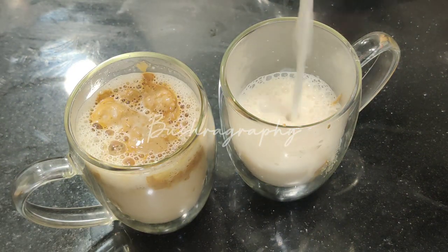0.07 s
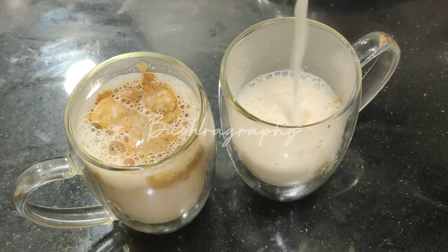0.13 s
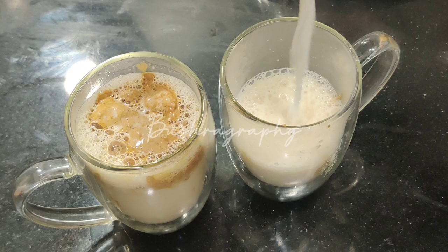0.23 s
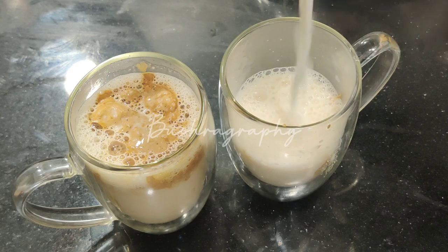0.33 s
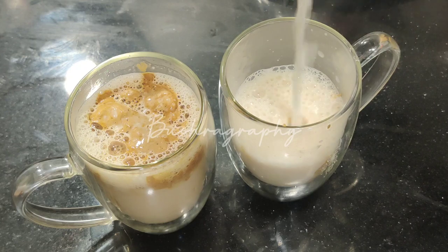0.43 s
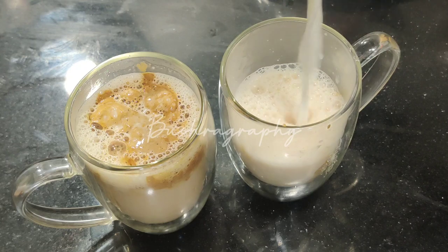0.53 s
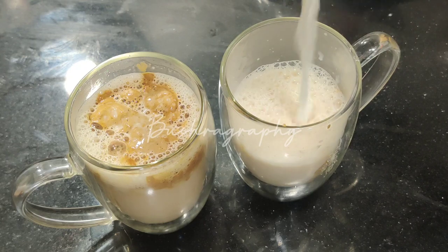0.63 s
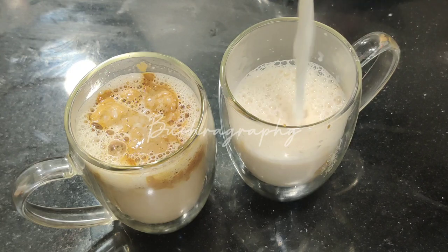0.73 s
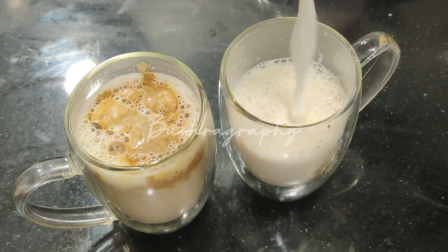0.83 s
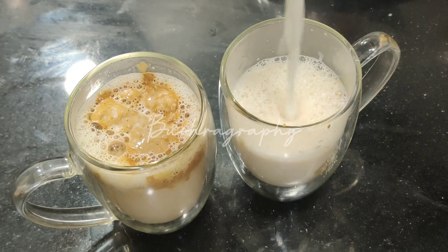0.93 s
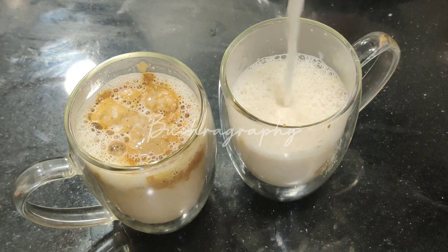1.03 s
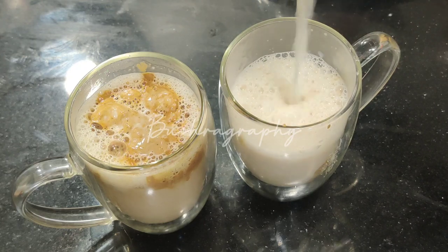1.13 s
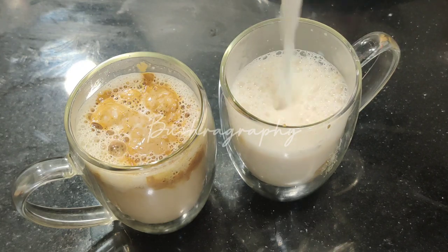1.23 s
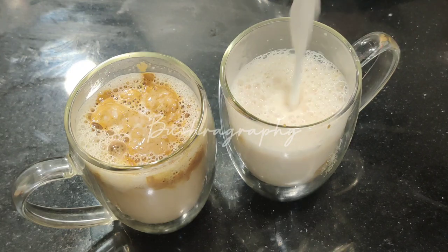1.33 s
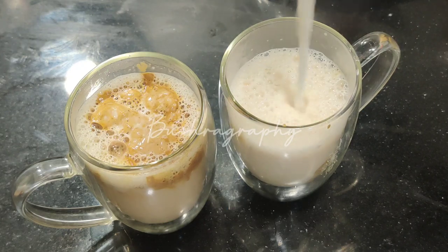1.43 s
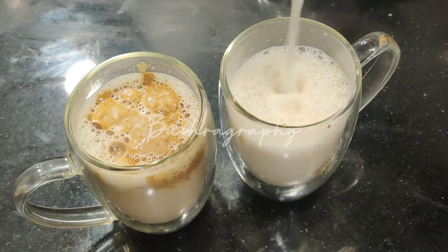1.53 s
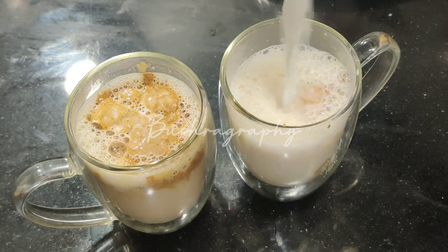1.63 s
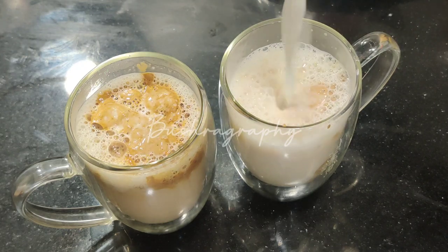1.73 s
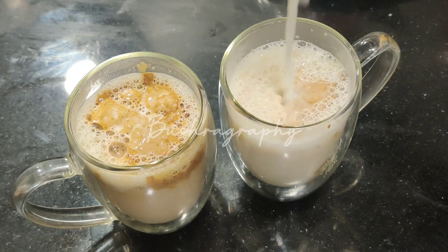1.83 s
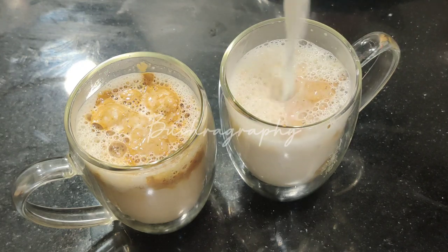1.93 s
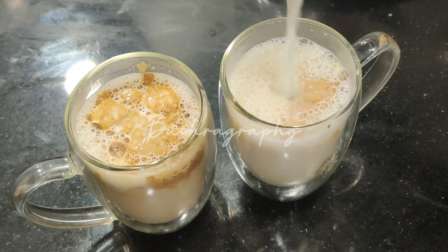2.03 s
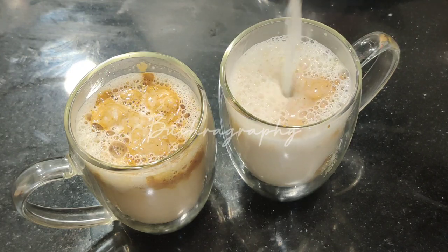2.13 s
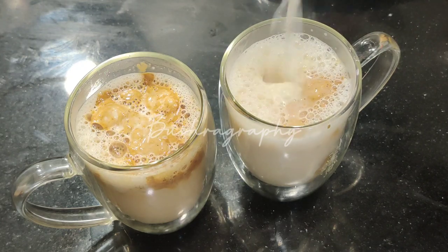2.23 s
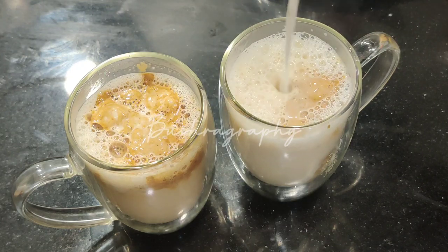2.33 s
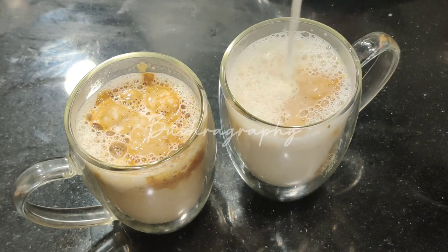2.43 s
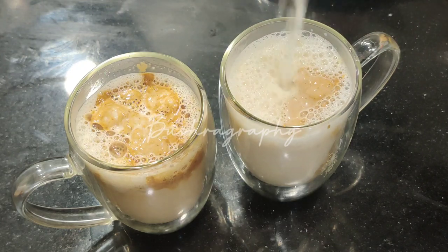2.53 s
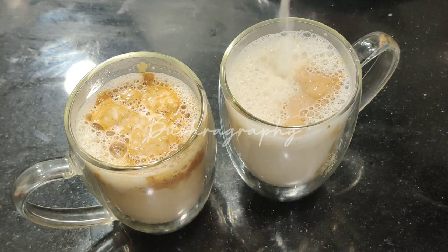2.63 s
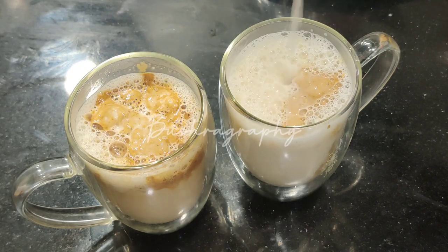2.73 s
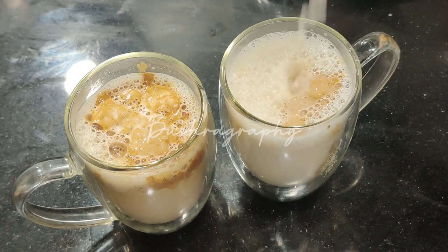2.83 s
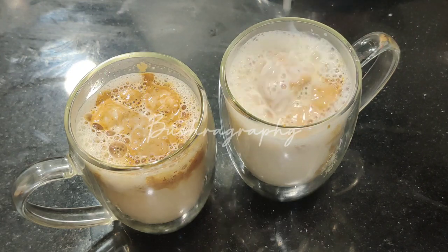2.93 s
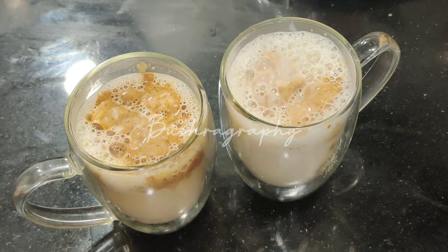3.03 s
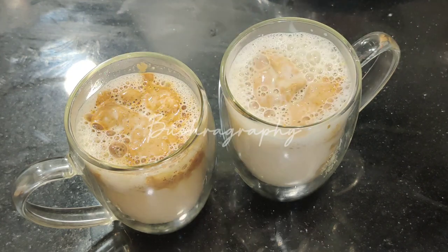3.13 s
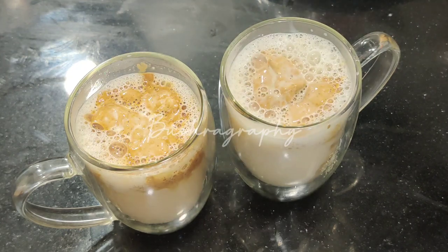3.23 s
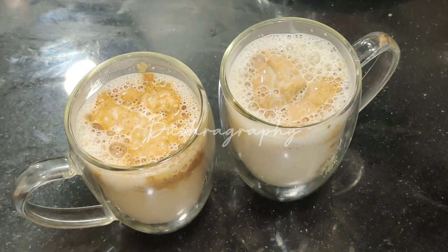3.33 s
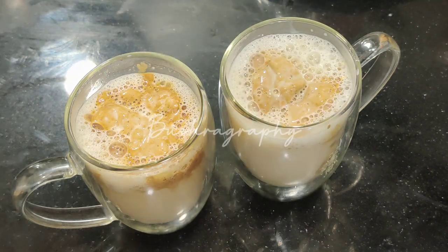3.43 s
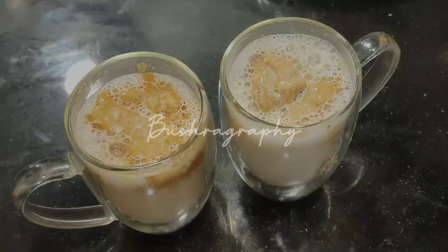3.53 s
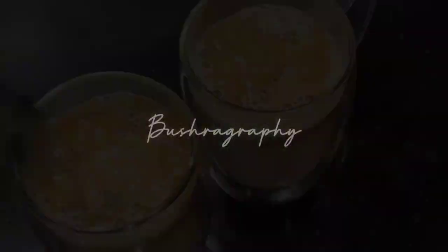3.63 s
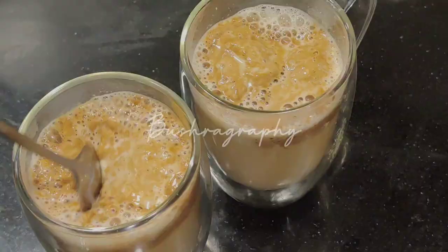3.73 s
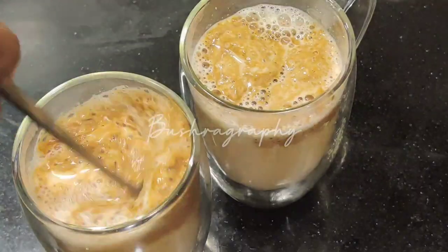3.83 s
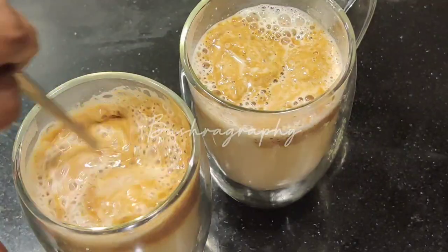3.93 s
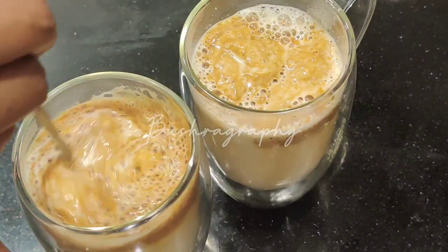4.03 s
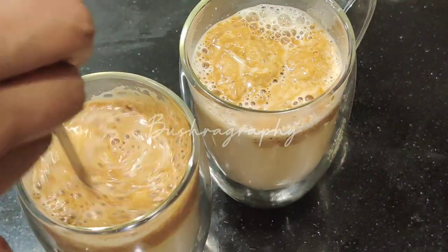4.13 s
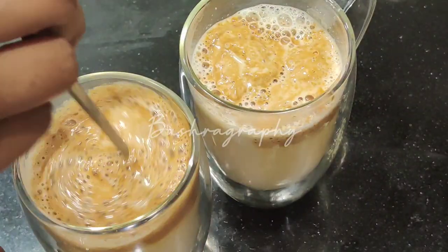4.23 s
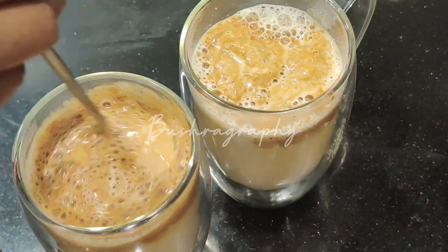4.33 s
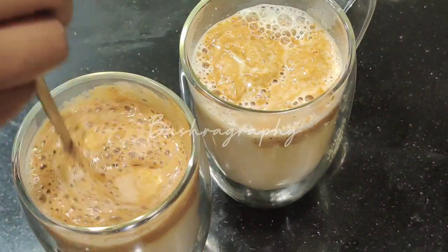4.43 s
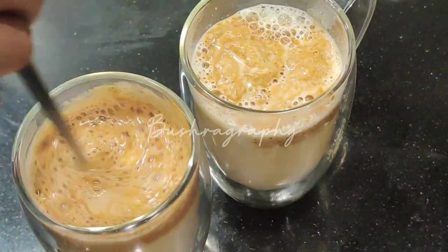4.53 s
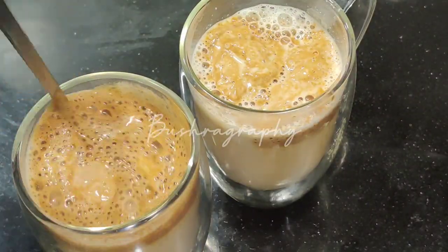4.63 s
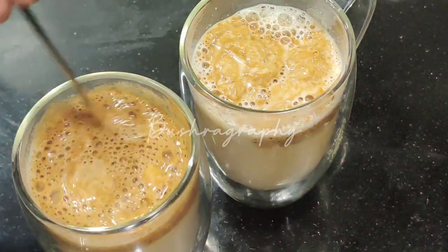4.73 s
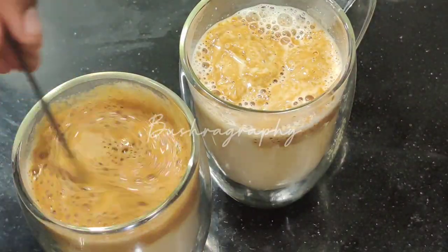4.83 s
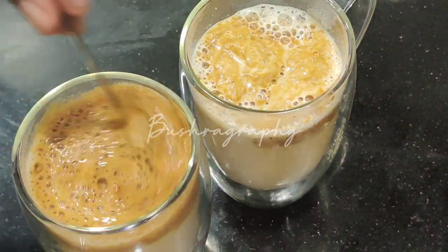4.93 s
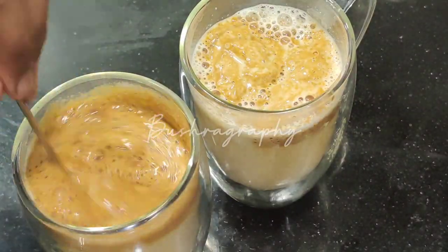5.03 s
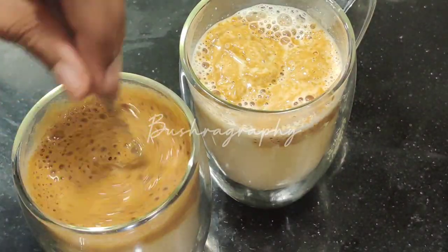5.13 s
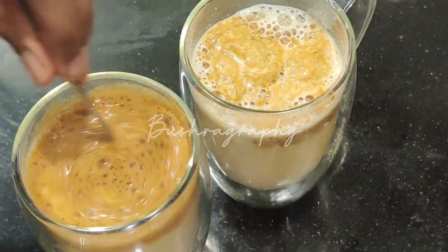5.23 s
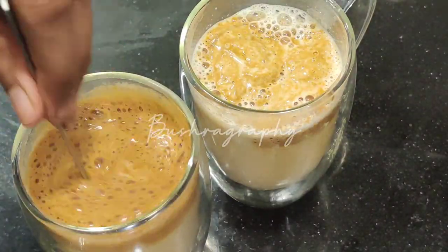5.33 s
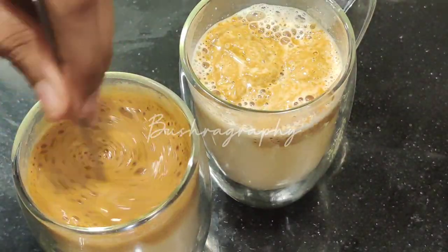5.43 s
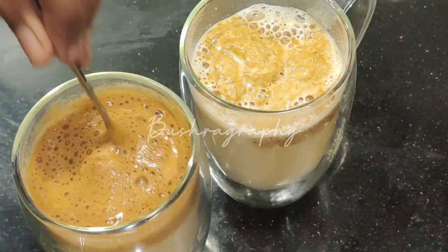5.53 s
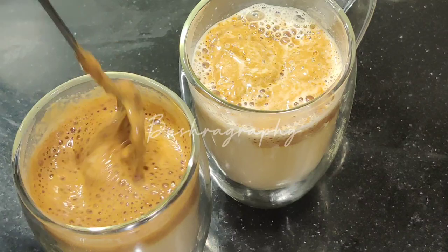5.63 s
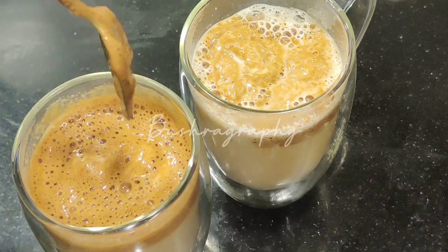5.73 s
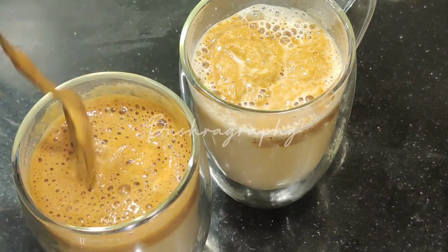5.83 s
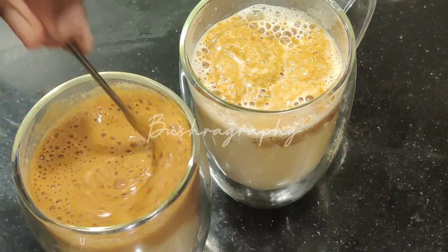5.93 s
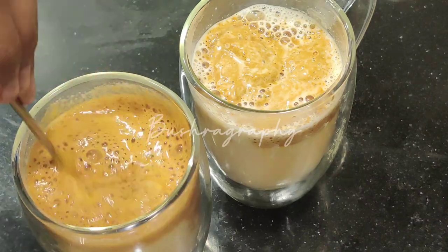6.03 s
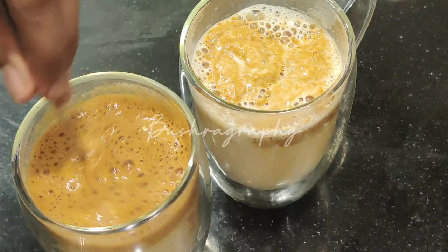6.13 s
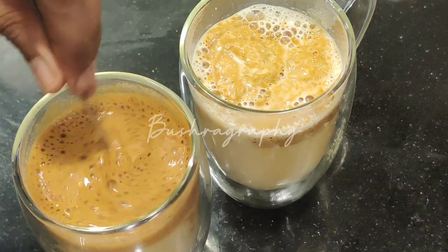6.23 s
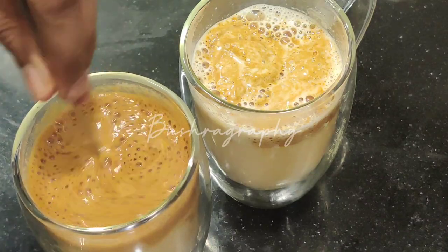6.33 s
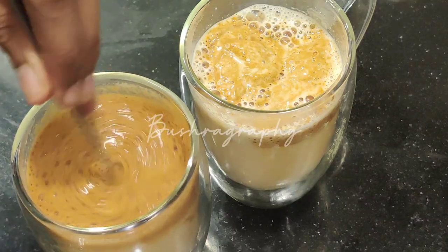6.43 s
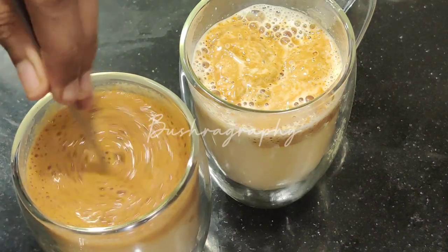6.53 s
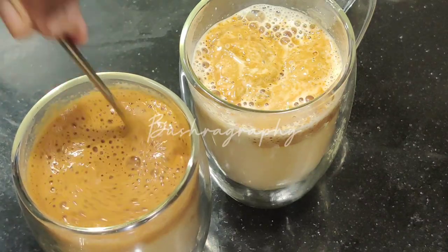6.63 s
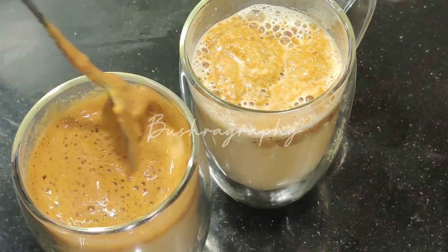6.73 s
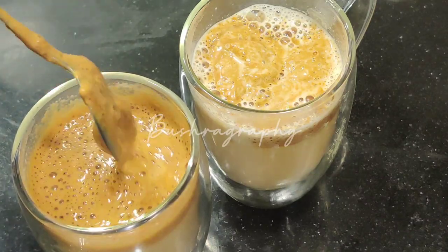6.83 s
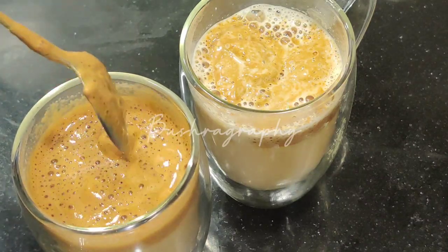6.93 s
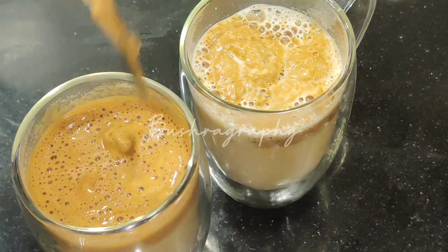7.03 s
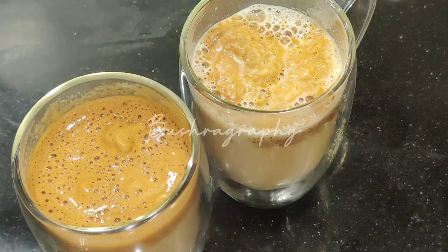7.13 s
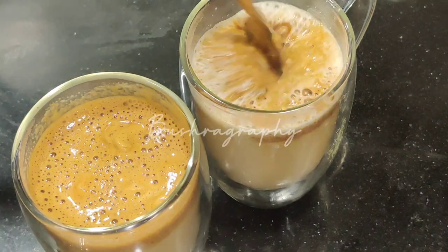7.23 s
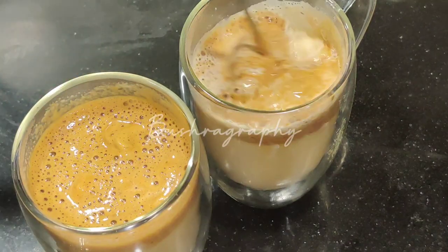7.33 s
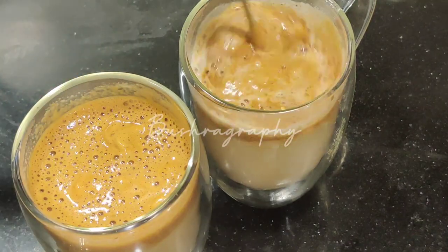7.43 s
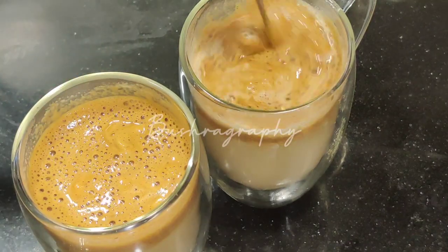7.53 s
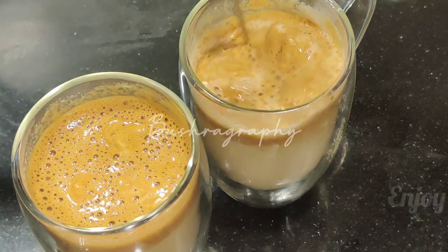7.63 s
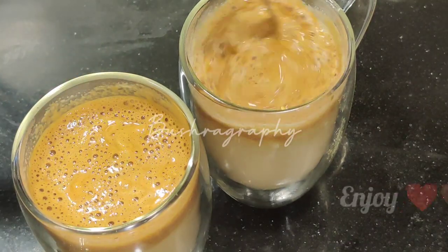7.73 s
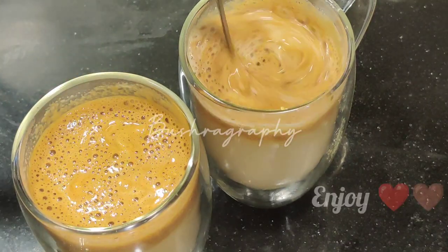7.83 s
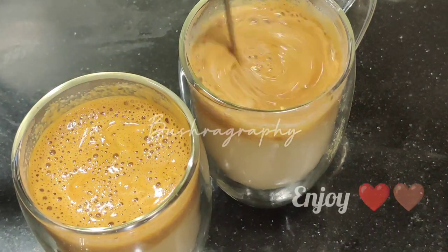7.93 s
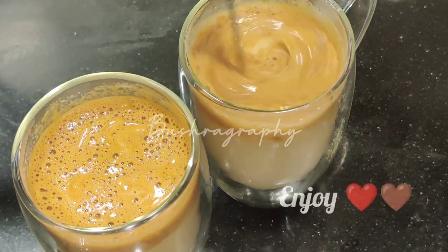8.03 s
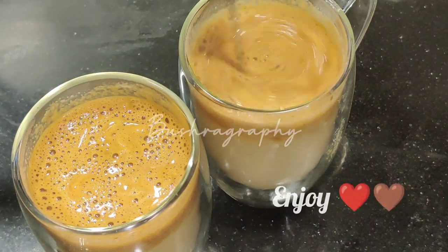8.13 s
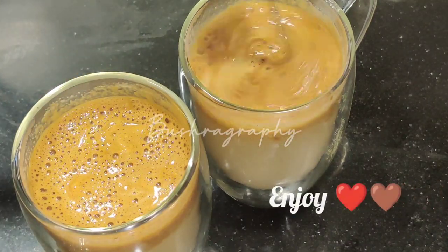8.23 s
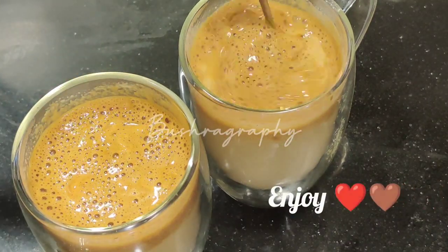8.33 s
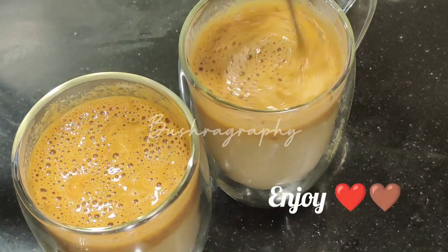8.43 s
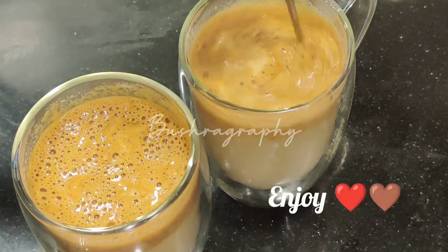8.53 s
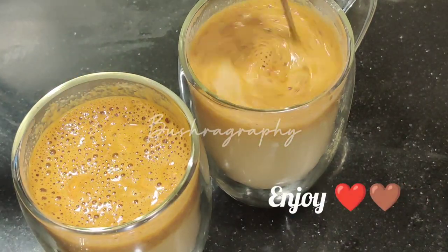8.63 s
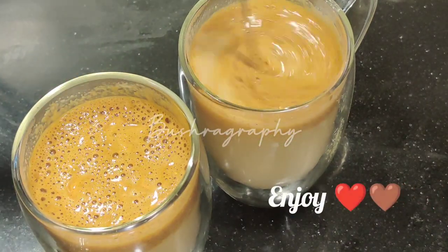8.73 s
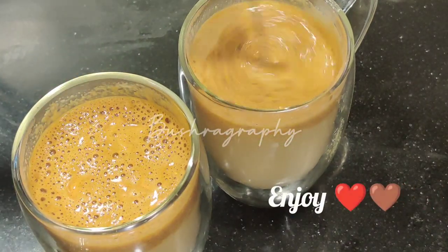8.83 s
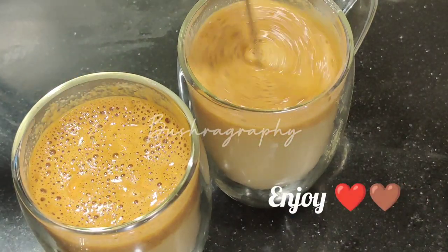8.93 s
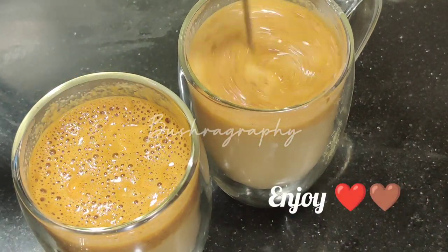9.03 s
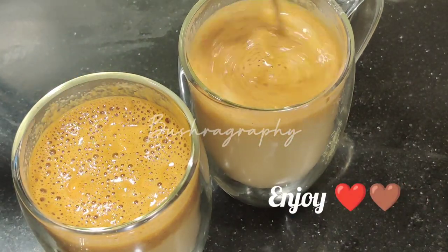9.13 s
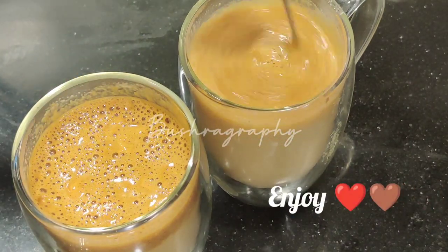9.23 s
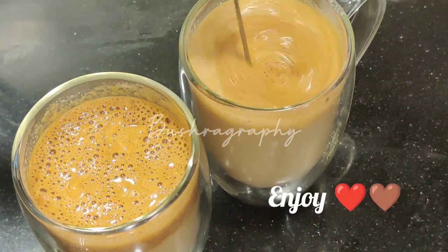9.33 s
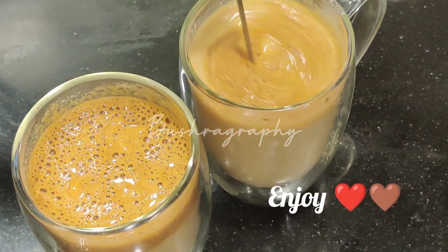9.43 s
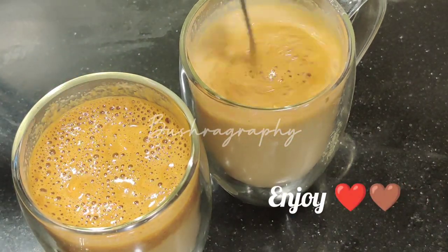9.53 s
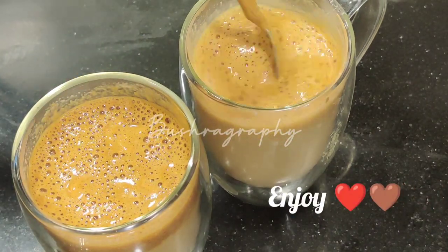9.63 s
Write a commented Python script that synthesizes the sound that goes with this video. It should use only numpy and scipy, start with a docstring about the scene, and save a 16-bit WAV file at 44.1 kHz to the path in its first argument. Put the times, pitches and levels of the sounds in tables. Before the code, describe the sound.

In a small kitchen, close up, milk streams into a glass mug for about three seconds with quick plops, wet slaps, gurgling and crackling froth. It thins out and the sound fades nearly to silence. Then a steel spoon stirs one full mug with dull thuds and soft scrapes, then another with brighter, busier knocks, over low hum and faint hiss.

```python
"""Hot milk poured, then stirred

Milk runs into a glass mug: swarms of gliding sines plop near the air column's pitch, short noise pops crackle as froth.
The sound dips almost to silence; then a steel spoon scrapes and knocks on one full mug and the next, as noisy
contact forces exciting damped glass modes. A wavering hum, low rumble, soft bumps, hiss and faint whines lie
beneath, and a short diffuse kitchen tail follows milk and spoon."""
import sys
import numpy as np
from scipy import signal
from scipy.fft import rfft, irfft, next_fast_len
from scipy.io import wavfile
from scipy.ndimage import uniform_filter1d, map_coordinates

SR = 44100
rng = np.random.default_rng(int(sys.argv[2]) if len(sys.argv) > 2 else 0)


def wrap_up_sound(samples):
    """Save the sound to the file named by the first command line argument, as 16-bit audio."""
    columns = np.atleast_2d(samples).T
    # keep every value between -1 and 1, then stretch to whole-number steps
    tamed = np.clip(columns, -1, 1)
    steps = np.round(tamed * 32767).astype(np.int16)
    wavfile.write(sys.argv[1], SR, steps)


N = 426447  # length [samples]


def amp(db):
    """Decibels to gain."""
    return 10 ** (np.asarray(db) / 20)


def unit(x):
    """Scale to rms 1."""
    return x / np.sqrt(np.mean(x ** 2) + 1e-20)


def along(points, hz):
    """Read (frequency, value) points on a logarithmic frequency axis."""
    f, value = np.transpose(points)
    return np.interp(np.log(hz + 1), np.log(f + 1), value)


def curves(rows):
    """Read each column after the time as a curve with one value per sample."""
    times, *columns = np.transpose(rows)
    t = np.arange(N) / SR
    return [np.interp(t, times, column) for column in columns]


def wobble(rate):
    """A smooth random curve with `rate` knots a second."""
    knots = rng.standard_normal(int(N * rate / SR) + 4)
    return map_coordinates(knots, [np.arange(N) * rate / SR])


def filtered(x, response):
    """Multiply the spectrum of x by a response given as a function of frequency."""
    n = x.shape[-1]
    padded = next_fast_len(n + 4096)
    spectrum = rfft(x, padded) * response(np.fft.rfftfreq(padded, 1 / SR))
    return irfft(spectrum, padded)[..., :n]


def colour(x, spectrum):
    """Shape x with a (frequency, level) spectrum."""
    return filtered(x, lambda hz: amp(along(spectrum, hz)))


def stereo(pair, side):
    """Use two unrelated signals as middle and side."""
    middle, difference = pair[0], side * pair[1]
    return np.array([middle + difference, middle - difference])


def add(track, s, sound):
    """Mix a sound into the track at s seconds."""
    start = max(round(s * SR), 0)
    part = track[:, start:start + sound.shape[-1]]
    part += sound[:, :part.shape[-1]]


def overlay(s, sounds):
    """Sum one channel of short sounds, one row per event, at their times s."""
    index = (s * SR).astype(int)[:, None] + np.arange(sounds.shape[1])
    return np.bincount(index.ravel(), sounds.ravel(), N)[:N]


def grains(s, hz, cycles, gain, rise):
    """Damped sines, one per event, gliding up by `rise` and given a random phase gap between the ears."""
    t = np.arange(SR // 50) / SR
    age = t * (hz / cycles)[:, None]
    phase = 2 * np.pi * hz[:, None] * t * (1 + rise * np.minimum(age, 2) / 2)
    decay = np.exp(-2 * age)
    onset = 1 - np.exp(-8 * age)
    life = gain[:, None] * decay * onset
    lag = 0.29 * rng.standard_normal((len(s), 1))
    return np.array([overlay(s, life * np.sin(phase + ear * lag)) for ear in (1, -1)])


def bursts(s, gain, t60):
    """Tiny pops: decaying puffs of noise, each with a sharper first edge."""
    t = np.arange(SR // 100) / SR
    noise = stereo(rng.standard_normal((2, len(s), len(t))), side=0.75)
    edge = 1 + 1.5 * np.exp(-t / 0.00027)
    puffs = noise * amp(-60 * t / t60) * edge
    return np.array([overlay(s, gain[:, None] * ear) for ear in puffs])


def surges(rows, rise_s, fall_s):
    """An envelope that swells up to each (time, level) event and dies away after it."""
    t = np.arange(N) / SR
    envelope = 0
    for s, db in rows:
        slope = np.minimum((t - s) / rise_s, (s - t) / fall_s)
        envelope = envelope + amp(db) * np.exp(np.maximum(slope, -20))
    return envelope


def steady(x):
    """Even out loudness to about rms 1, following power over roughly an eighth of a second."""
    power = uniform_filter1d(np.mean(x ** 2, 0), SR // 8)
    power = np.abs(uniform_filter1d(power, SR // 20))
    return x / np.sqrt(power + 1e-3 * power.max())


# spectrum of the room hiss: (frequency [Hz], relative level [dB])
HISS_SPECTRUM = [(76, -36), (130, -1.5), (300, -5), (430, -7.5), (680, -7), (1300, -15), (1900, -16),
                 (4400, -22), (7500, -27), (11300, -28), (15000, -21.5), (15800, -36)]
# likeness of the hiss in the two ears: (frequency [Hz], left-right correlation [-1 to 1])
HISS_LIKENESS = [(60, .99), (180, 0.97), (550, 0.5), (1650, -0.25), (15000, -0.13)]


def room_hiss():
    """Coloured noise whose middle and side balance sets how alike the ears are at each frequency."""
    def middle_and_side(hz):
        angle = np.arccos(np.clip(along(HISS_LIKENESS, hz), -1, 1)) / 2
        return amp(along(HISS_SPECTRUM, hz)) * [np.cos(angle), np.sin(angle)]
    pair = filtered(rng.standard_normal((2, N)), middle_and_side)
    return amp(-52.0 + 0.12 * wobble(2.1)) * unit(stereo(pair, side=1))


# mean level of the hum: (time [s], level [dB])
HUM_LEVEL = [(2.7, -44.5), (3.1, -48.5), (7.2, -49), (7.8, -46.5)]


def appliance_hum():
    """A low sine wandering in phase and level."""
    t = np.arange(N) / SR
    level_db, = curves(HUM_LEVEL)
    tone = np.sin(2 * np.pi * 89.5 * t + 0.9 * wobble(20))
    return amp(level_db + 1.3 * wobble(21)) * unit(tone)


# spectrum of the rumble: (frequency [Hz], relative level [dB])
RUMBLE_SPECTRUM = [(15, -21), (28, -1.5), (43, -8), (56, -2), (75, -4), (120, -5), (170, -15.5),
                   (300, -45.5)]
# strength of the milk stream, also driving pour(); it falters once and thins out: (time [s], relative level [dB])
STREAM_FLOW = [(0, 1.5), (.15, 0), (.22, -7), (.32, 2.5), (.6, 0), (2.7, -1), (2.84, -10), (3.1, -28)]
RUMBLE_DB, POUR_RUMBLE_DB = -52, -47  # constant part; part following the stream, at 0 dB flow


def rumble():
    """Low noise, nearly the same in both ears, stronger while the stream runs."""
    flow_db, = curves(STREAM_FLOW)
    gain = np.hypot(amp(RUMBLE_DB), amp(POUR_RUMBLE_DB + flow_db))
    noise = colour(rng.standard_normal((2, N)), RUMBLE_SPECTRUM)
    return gain * unit(stereo(noise, side=.12))


# soft low bumps of handling: (time [s], level [dB])
HANDLING_BUMPS = [(.77, -47), (3.72, -46), (3.84, -46.5), (3.96, -47)]
BUMP_RISE_S, BUMP_FALL_S = 0.065, 0.14


def handling_bumps():
    """Low noise that swells and dies away at each bump."""
    thud = colour(rng.standard_normal(N), [(20, -8), (38, -8), (70, -17), (400, -54.5)])
    return surges(HANDLING_BUMPS, BUMP_RISE_S, BUMP_FALL_S) * unit(thud)


# faint whines: (frequency [Hz], level [dB])
FAINT_WHINES = [(1830, -73), (1990, -78), (2821, -80), (3289, -80), (4441, -80), (5529, -80), (11989, -83),
                (13814, -76)]


def whines():
    """Thin sines, their phase wavering separately in each ear."""
    t = np.arange(N) / SR
    total = 0
    for hz, db in FAINT_WHINES:
        waver = 0.41 * np.array([wobble(30), wobble(30)])
        total = total + amp(db) * unit(np.sin(2 * np.pi * hz * t + waver))
    return total


def background():
    """The bed of hiss, hum, rumble, bumps and whines."""
    return room_hiss() + appliance_hum() + rumble() + handling_bumps() + whines()


# how long the room rings: (frequency [Hz], 60 dB decay time [s])
KITCHEN_DECAY = [(200, 0.59), (2000, 0.29), (12000, 0.19)]


def kitchen(x):
    """The room's short diffuse tail: noise decaying at its own rate in each band, convolved with x."""
    hz, t, bands = signal.stft(rng.standard_normal((2, SR // 2)), SR, nperseg=256)
    decay = amp(-60 * t / along(KITCHEN_DECAY, hz)[:, None])
    tail = signal.istft(bands * decay, SR, nperseg=256)[1]
    return signal.oaconvolve(x, tail / np.linalg.norm(tail[0]), axes=1)[:, :N]


# modes of each full mug with the spoon in it: (frequency [Hz], width [Hz], mean relative level [dB])
FIRST_MUG_MODES = [(530, 350, -3), (1303, 205, 4.5), (2076, 67, -10), (2890, 250, -5.5), (3280, 66, -8),
                   (5040, 130, -15), (6740, 170, -3.5)]
SECOND_MUG_MODES = [(970, 340, -1), (1492, 200, 2), (2047, 37, -4.5), (2567, 48, -1), (2860, 115, 0.5),
                    (3270, 110, -1.5), (3460, 160, -3.5), (3760, 37, -9), (3830, 25, -8), (4350, 71, -5.5),
                    (5170, 58, -6), (5380, 110, -8), (6390, 70, -2), (7030, 120, -3.5), (7800, 57, -15),
                    (8430, 74, -4), (10850, 97, -5)]
CHANGE_MUG_S = 7.1  # touches from here on sound the second mug
# spectrum of the crack and echo noise: (frequency [Hz], relative level [dB per Hz])
CONTACT_SPECTRUM = [(100, -38), (300, -6), (600, 0), (1000, 0.5), (3300, -3.5), (4600, -9.5), (7000, -7),
                    (9400, -11), (11000, -8), (15500, -9)]


def mug_response(s, crack_db, crack_t60, counter_db, counter_t60):
    """One touch of the spoon: modes damped by the drink, a short crack, diffuse echoes off counter and wall."""
    t = np.arange(SR // 7) / SR
    modes = FIRST_MUG_MODES if s < CHANGE_MUG_S else SECOND_MUG_MODES
    hz, width, db = np.transpose(modes)[:, :, None]
    # every touch catches the modes in a different balance
    strength = width * amp(db + 2.1 * rng.standard_normal((2, len(hz), 1)))
    phase = 2 * np.pi * (hz * t + rng.random((2, len(hz), 1)))
    ring = np.sum(strength * np.sin(phase) * np.exp(-np.pi * width * t), 1)
    crack, echoes = colour(rng.standard_normal((2, 2, len(t))), CONTACT_SPECTRUM)
    direct = unit(ring) + amp(crack_db) * unit(crack * amp(-60 * t / crack_t60))
    return stereo(direct, side=0.93) + amp(counter_db) * unit(echoes * amp(-60 * t / counter_t60))


CONTACT_PEAK_DB, CONTACT_OCTAVES = 8, 0.83  # height and width of the emphasis around the contact pitch
MIDDLE_HZ, BODY_HZ = 2500, 790  # pitch of a middling contact; the treble tilt is flat below BODY_HZ
# treble slope of a middling contact, and its change per octave of contact pitch
TILT_DB_PER_OCTAVE, HARDER_DB_PER_OCTAVE = -1.44, 0.38


def contact_colour(hz, pitch_hz):
    """A contact favours the modes near its pitch; a harder one is higher and has more treble."""
    slope_db = TILT_DB_PER_OCTAVE + HARDER_DB_PER_OCTAVE * np.log2(pitch_hz / MIDDLE_HZ)
    distance = np.log2((hz + 1) / pitch_hz) / CONTACT_OCTAVES
    peak_db = CONTACT_PEAK_DB * np.exp(-.5 * distance ** 2)
    return amp(peak_db + slope_db * np.log2(np.maximum(hz, BODY_HZ) / MIDDLE_HZ))


def touch(s, force, pitch_hz):
    """The mug's answer to a contact force, with the energy of 40 ms at rms 1."""
    response = mug_response(s, crack_db=2.0, crack_t60=0.038, counter_db=0.5, counter_t60=0.12)
    sound = signal.fftconvolve(force[None], response, axes=1)
    sound = filtered(sound, lambda hz: contact_colour(hz, pitch_hz))
    return unit(sound) * np.sqrt(.04 * SR / sound.shape[1])


def friction(t, spread_db):
    """Spiky stick-slip force of steel on glass: noise with a random level at each sample."""
    spikes = amp(spread_db * rng.standard_normal(len(t)))
    return unit(rng.standard_normal(len(t)) * spikes)


# spoon knocks: (time [s], chatter decay [s], relative level [dB], contact pitch [Hz])
SPOON_KNOCKS = [(4.0043, .006, -38.5, 1280), (4.143, .009, -38.5, 790), (4.472, .008, -49, 2760),
                (6.2427, 0.00097, -31, 1830), (6.4174, .002, -44, 3390), (7.7593, 0.0026, -33, 6000),
                (7.8128, 0.0092, -36, 1600), (7.8637, 0.0019, -23.5, 4670), (8.016, .01, -39, 7140),
                (8.026, .004, -39, 2000), (8.0845, 0.0024, -37, 2580), (8.135, 0.0076, -32, 4520),
                (8.146, .003, -35.5, 1900), (8.476, .005, -44, 9000), (8.5058, 0.011, -27, 5740),
                (8.6246, .004, -33.5, 5000), (8.7092, 0.0036, -35, 2280), (8.829, .0033, -48, 1900),
                (9.071, 0.0019, -33, 2940), (9.2293, 0.0069, -31.5, 3100), (9.258, .0022, -45.5, 2810),
                (9.4046, .001, -35.5, 3180)]


def knocks():
    """A single hit followed by a brief chatter of friction."""
    track, t = np.zeros((2, N)), np.arange(SR // 8) / SR
    for s, chatter_s, db, pitch_hz in SPOON_KNOCKS:
        force = 0.065 * friction(t, spread_db=6.5) * np.exp(-t / max(chatter_s, 1e-4))
        force[0] += 1  # the hit itself
        add(track, s, amp(db) * touch(s, force, pitch_hz))
    return track


# spoon sliding along the wall: (middle time [s], relative level [dB], contact pitch [Hz])
SPOON_SCRAPES = [(3.998, -43.5, 5540), (4.281, -45.5, 1620), (4.586, -50.5, 3870), (4.745, -45, 4690),
                 (4.842, -50.5, 4920), (4.91, -42, 5700), (4.978, -51, 1400), (5.075, -47.5, 3940),
                 (6.139, -50, 9000), (6.188, -41, 1550), (6.329, -39, 2060), (6.42, -40.5, 3900),
                 (6.493, -37, 2610), (6.606, -42, 1630), (7.279, -51, 1800), (7.395, -37, 4280),
                 (7.511, -38, 5260), (7.627, -36, 6750), (7.72, -46, 6000), (7.976, -37, 3870),
                 (8.3, -40, 1700), (8.627, -35.5, 5600), (8.67, -43.5, 6530), (8.903, -44, 1180),
                 (9.0, -49, 1100), (9.127, -44.5, 1130), (9.172, -45, 1370), (9.321, -43, 1070)]
SCRAPE_RISE_S, SCRAPE_FALL_S = 0.013, .016  # the spoon catches the wall quickly and lets go more slowly


def scrapes():
    """Friction that swells and fades as the spoon slides along the glass."""
    track, t = np.zeros((2, N)), np.arange(SR // 8) / SR
    age = t - t.mean()
    swell = np.exp(-(age / np.where(age < 0, SCRAPE_RISE_S, SCRAPE_FALL_S)) ** 2)
    for s, db, pitch_hz in SPOON_SCRAPES:
        force = friction(t, spread_db=5) * swell
        add(track, s - t.mean(), amp(db) * touch(s, force, pitch_hz))
    return track


# hollow thuds as the spoon works through the first mug: (time [s], relative level [dB], pitch [Hz])
SPOON_THUDS = [(4.004, -27, 570), (4.143, -25.5, 464), (4.978, -40, 570), (6.063, -35, 468),
               (6.279, -33, 480)]


def thuds():
    """Dull, quickly damped sines in the drink, without a glide."""
    s, db, hz = np.transpose(SPOON_THUDS)
    return grains(s, hz, cycles=4.7, gain=amp(db), rise=0)


# lean of the spoon between the ears: (frequency [Hz], left minus right [dB])
SPOON_BALANCE = [(550, 1), (2000, 0), (6000, -1), (14000, -4.5)]


def spoon():
    """Knocks, scrapes and thuds, leaning to one side more or less with frequency."""
    track = knocks() + scrapes() + thuds()
    return filtered(track, lambda hz: amp(np.outer([.5, -.5], along(SPOON_BALANCE, hz))))


POUR_END_S = 3.1


def swarm(rate, spread_db):
    """Times and gains of random pour events: little clusters, many small, a few large."""
    draw = rng.random((int(rate * POUR_END_S), 3))
    s = draw[:, 0] * POUR_END_S
    # every second event follows on the heels of another
    s[1::2] = s[:-1:2] - .004 * np.log(draw[1::2, 2] + 0.00078)
    return s, amp(-spread_db * np.log(draw[:, 1] + .012))


SOUND_M_PER_S = 343
AIR_COLUMN_M, FILL_M_PER_S = .069, 0.0096  # empty height above the milk at the start; how fast the milk rises


def column_hz(s):
    """Quarter-wave pitch of the air above the rising milk."""
    return SOUND_M_PER_S / (4 * (AIR_COLUMN_M - FILL_M_PER_S * s))


def bubbles():
    """Trapped air rings near the air column's pitch; as the mug fills the pitches scatter and the ring shortens."""
    s, size = swarm(rate=420, spread_db=4.5)
    scatter = np.interp(s, [.5, 2.2], [.1, .19])
    cycles = np.interp(s, [.55, 1.8], [4.6, 2.4])
    hz = column_hz(s) * np.exp(scatter * rng.standard_normal(len(s)))
    return steady(grains(s, hz, cycles, size, rise=0.027))


# resonances of the filling mug's wall: (frequency [Hz], width [Hz], level against the direct sound [dB])
WALL_MODES = [(2696, 34, 4), (3420, 160, -4.5), (5040, 230, -1)]


def in_mug(x):
    """Whatever strikes the milk also rings the glass wall: resonances added to the direct sound."""
    def response(f):
        total = 1
        for centre, width, db in WALL_MODES:
            total = total + amp(db) * 1j * f * width / (centre * centre - f * f + 1j * f * width)
        return total
    return filtered(x, response)


# spectrum of spray and slaps: (frequency [Hz], relative level [dB])
SPLASH_SPECTRUM = [(300, -6), (1000, 7), (2200, -4), (3500, 1), (5200, -7.5), (7000, -6), (15000, -28)]


def splash():
    """Small short-lived bubbles and noisy spray where the stream enters."""
    s, size = swarm(rate=380, spread_db=5)
    hz = 3900 * np.exp(0.4 * rng.standard_normal(len(s)))
    small = grains(s, hz, cycles=5.7, gain=size, rise=0.078)
    spray = colour(bursts(s, size, t60=0.061), SPLASH_SPECTRUM)
    return steady(in_mug(unit(small) + amp(4.5) * unit(spray)))


# spectrum of froth and its large bursts: (frequency [Hz], relative level [dB])
FROTH_SPECTRUM = [(500, -16), (2500, -1.5), (5000, -3), (7700, -0.5), (8600, 2.5), (11000, -0.5),
                  (15500, 1)]


def froth():
    """Pops of the foam, with fainter high pings, over a fine hiss."""
    s, size = swarm(rate=420, spread_db=4.5)
    hz = 10000 * np.exp(0.213 * rng.standard_normal(len(s)))
    pings = grains(s, hz, cycles=19, gain=size, rise=0.056)
    pops = unit(bursts(s, size, t60=0.019)) + amp(-13.5) * unit(pings)
    hiss = amp(-4.5) * rng.standard_normal((2, N))
    return steady(colour(pops + hiss, FROTH_SPECTRUM))


# spectrum of the gurgle: (frequency [Hz], relative level [dB])
GURGLE_SPECTRUM = [(60, -17), (150, -3.5), (400, 1), (700, -0.5), (1100, 7), (2000, -27)]


def gurgle():
    """Deep, widely scattered bubbles whose pitch climbs as the mug fills."""
    s, size = swarm(rate=260, spread_db=0)
    hz = np.interp(s, [.3, 1.9], [270, 430]) * np.exp(0.448 * rng.standard_normal(len(s)))
    deep = grains(s, hz, cycles=2.3, gain=size, rise=0.059)
    return steady(colour(deep, GURGLE_SPECTRUM))


# large froth bubbles bursting, also heard as ticks in drops(): (time [s], relative level [dB])
FROTH_BURSTS = [(0.152, -27.5), (0.6908, -22), (0.904, -24), (1.2275, -21.5), (1.291, -30), (1.5219, -24.5),
                (1.6602, -29.5), (1.8444, -26), (1.915, -25), (2.1735, -23), (2.2592, -25.5), (2.335, -33),
                (2.844, -40)]
SPLASH_DB, FROTH_DB, GURGLE_DB = -50.5, -48.5, -51  # at 0 dB flow
BUBBLE_DB, BUBBLE_FADE_DB_PER_S = -43.5, 2.5  # at the start and 0 dB flow; the growing foam quietens the bubbles
FOAM_HEAD_S, FOAM_HEAD_DB = 2.35, -5  # from here, under a thick head, the froth calms
CRACKLE_DB, CRACKLE_S = -21.5, 0.021  # froth set off by a large burst: level against the burst, decay time


def pour():
    """One flow drives bubbles, splash, froth and gurgle; each large burst sets the froth crackling."""
    t = np.arange(N) / SR
    flow_db, = curves(STREAM_FLOW)
    head_db, = curves([(FOAM_HEAD_S, 0), (FOAM_HEAD_S + .05, FOAM_HEAD_DB)])
    milk = amp(BUBBLE_DB - BUBBLE_FADE_DB_PER_S * t) * bubbles()
    milk = milk + amp(SPLASH_DB) * splash() + amp(GURGLE_DB) * gurgle()
    crackle = amp(CRACKLE_DB) * surges(FROTH_BURSTS, rise_s=0.0043, fall_s=CRACKLE_S)
    foam = amp(FROTH_DB + flow_db + head_db + 1.9 * wobble(18)) + crackle
    return amp(flow_db) * milk + foam * froth()


# large bubbles: (time [s], relative level [dB])
LARGE_BUBBLES = [(0.0704, -19.5), (0.151, -20), (0.312, -22), (0.409, -29), (0.4541, -17), (0.507, -19),
                 (0.5651, -19), (0.7667, -21), (1.097, -23), (1.1528, -18.5), (1.2067, -20)]
# drops slapping the surface: (time [s], relative level [dB], mean pitch [Hz])
SURFACE_SLAPS = [(0.262, -18.5, 5120), (.345, -15.5, 2500), (1.561, -24.5, 2740), (2.036, -26, 1800),
                 (2.1261, -17, 2060), (2.2, -25, 1620), (2.5619, -21, 3680), (2.651, -21, 1800),
                 (2.6787, -22, 1950), (2.714, -25, 2200), (2.7748, -28, 2670)]
SLAP_BUBBLE_S, SLAP_BUBBLE_DB = .005, -6  # bubble train under a slap: typical spacing, level step per bubble


def drops():
    """Large bubbles at the air column's pitch, slaps with a train of bubbles, and sharp ticks of bursting froth."""
    s, db = np.transpose(LARGE_BUBBLES)
    plop_hz = column_hz(s) * np.exp(0.044 * rng.standard_normal(len(s)))
    plops = grains(s, plop_hz, cycles=5.3, gain=amp(db), rise=0.015)
    s, db, hz = np.transpose(SURFACE_SLAPS)
    slaps = amp(-16) * colour(bursts(s, amp(db), t60=0.033), SPLASH_SPECTRUM)
    for k in range(3):
        late, detune = rng.standard_normal((2, len(s)))
        bubble_s = s + k * SLAP_BUBBLE_S * np.exp(0.249 * late)
        bubble_hz = hz * np.exp(0.13 * detune)
        gain = amp(db + k * SLAP_BUBBLE_DB)
        slaps = slaps + grains(bubble_s, bubble_hz, cycles=1.85, gain=gain, rise=0.026)
    s, db = np.transpose(FROTH_BURSTS)
    ticks = amp(-10.5) * colour(bursts(s, amp(db), t60=0.023), FROTH_SPECTRUM)
    return plops + in_mug(slaps) + ticks


def scene():
    """Milk, then spoon, with the kitchen's tail over the background."""
    milk, stirring = pour() + drops(), spoon()
    tail = kitchen(amp(-7.5) * milk + amp(-15.0) * stirring)
    return milk + stirring + tail + background()


# fade out and in of the whole sound: (time [s], gain [factor])
FADE_GAIN = [(3.38, 0.91), (3.52, 0.42), (3.64, 0.008), (3.76, 0.65), (3.87, 1)]
TOP_HZ = 15850  # nothing sounds above this


def record(dry):
    """A fade out and in between pouring and stirring, then the band limit."""
    fade, = curves(FADE_GAIN)
    return filtered(dry * fade, lambda hz: hz < TOP_HZ)


dry = scene()
out = record(dry)
wrap_up_sound(out)
```